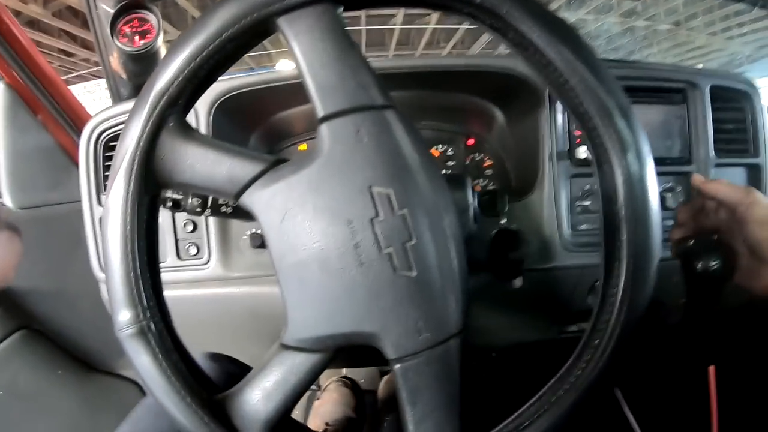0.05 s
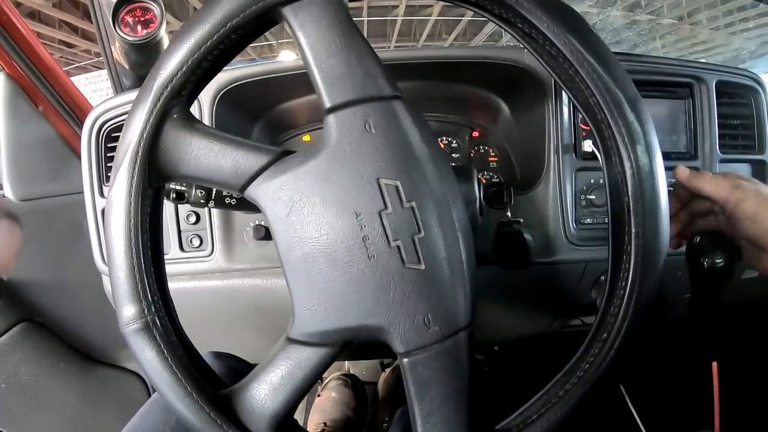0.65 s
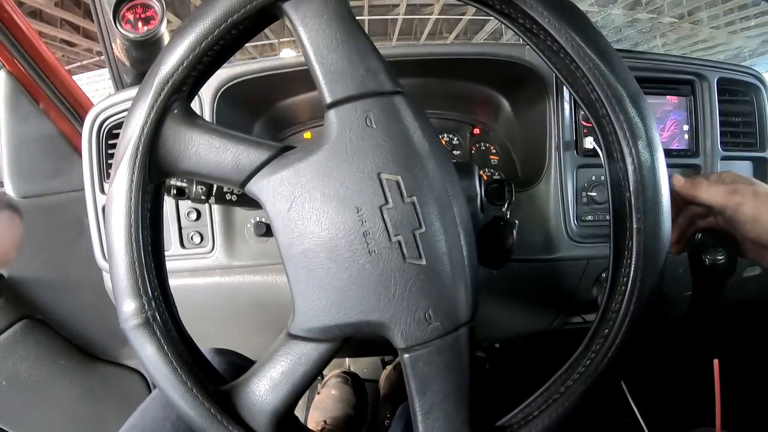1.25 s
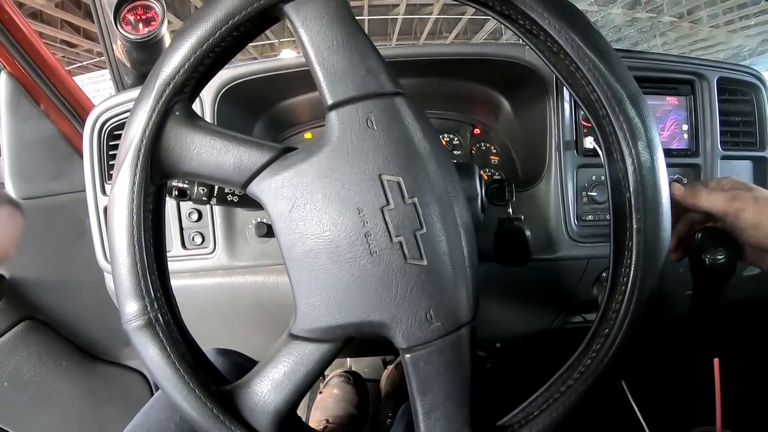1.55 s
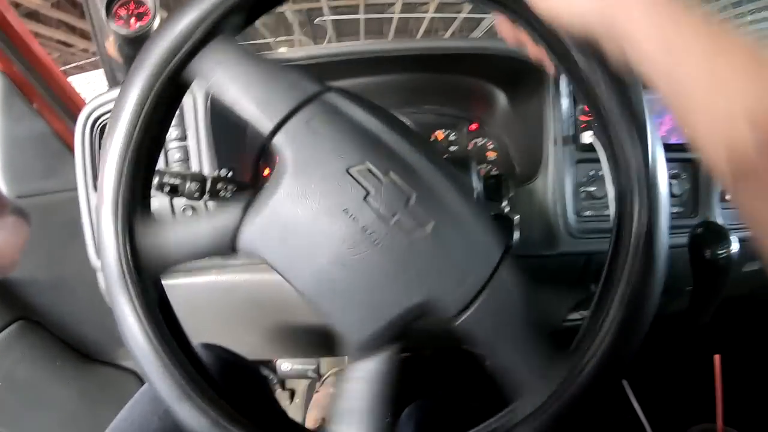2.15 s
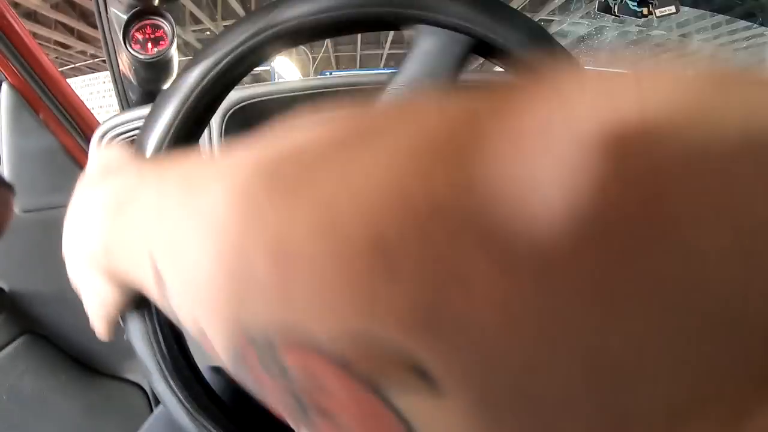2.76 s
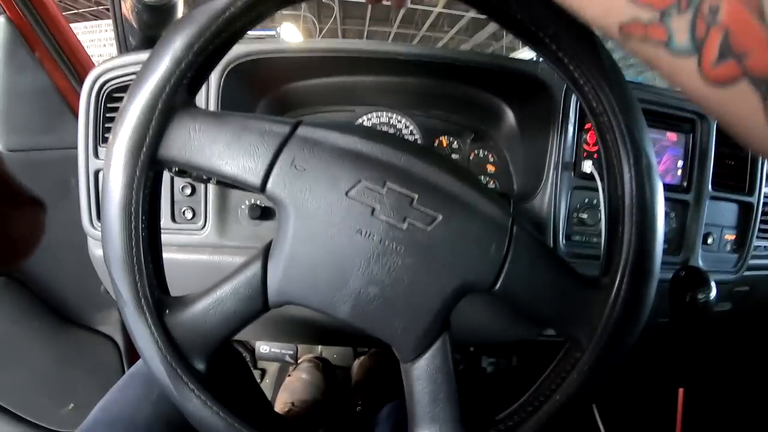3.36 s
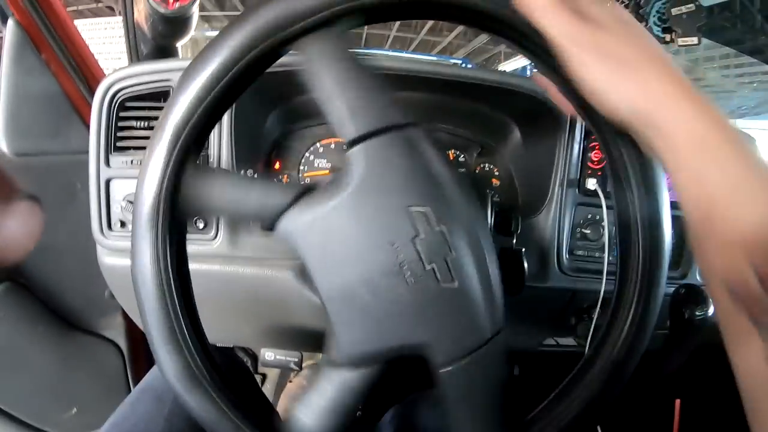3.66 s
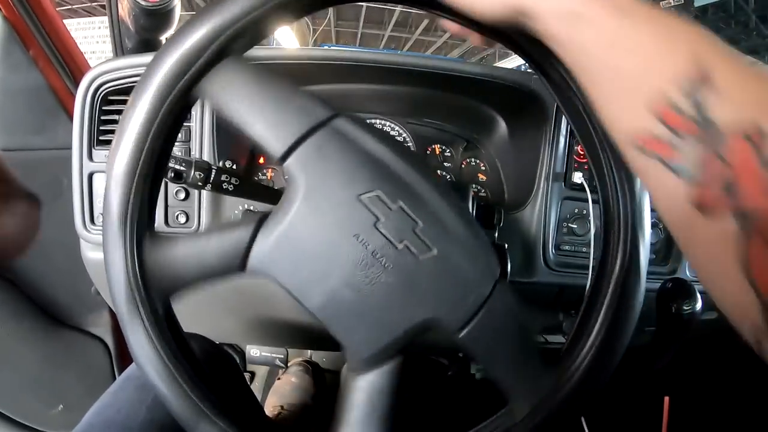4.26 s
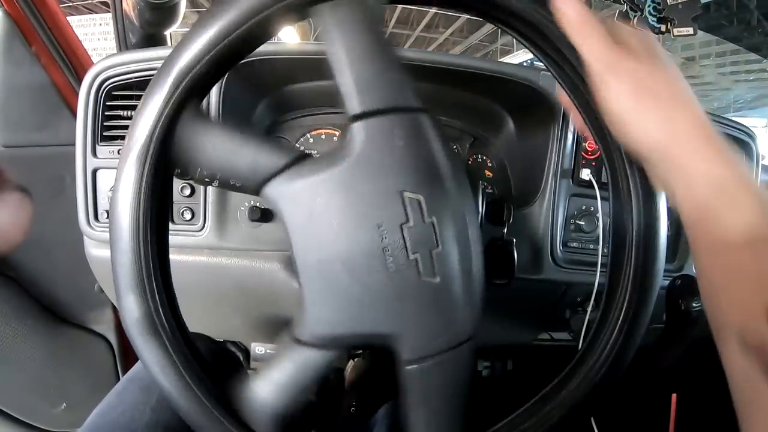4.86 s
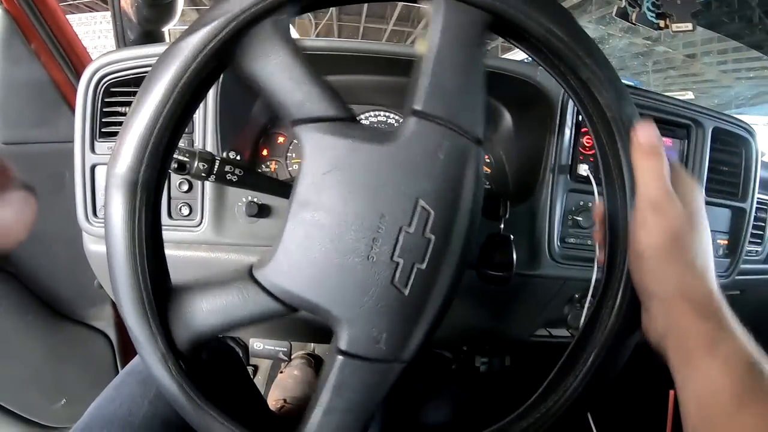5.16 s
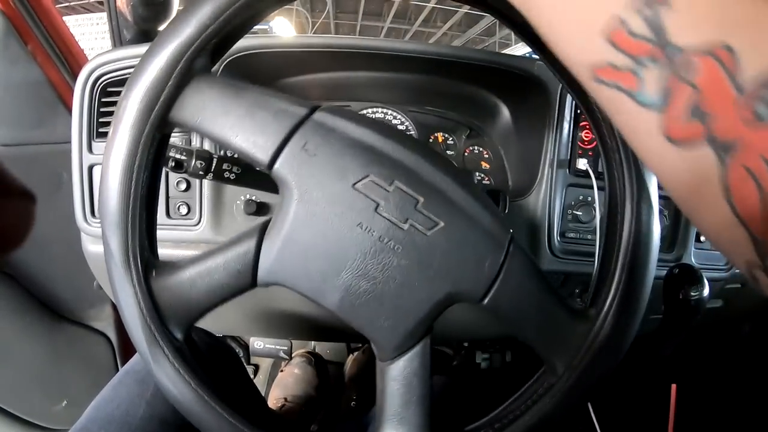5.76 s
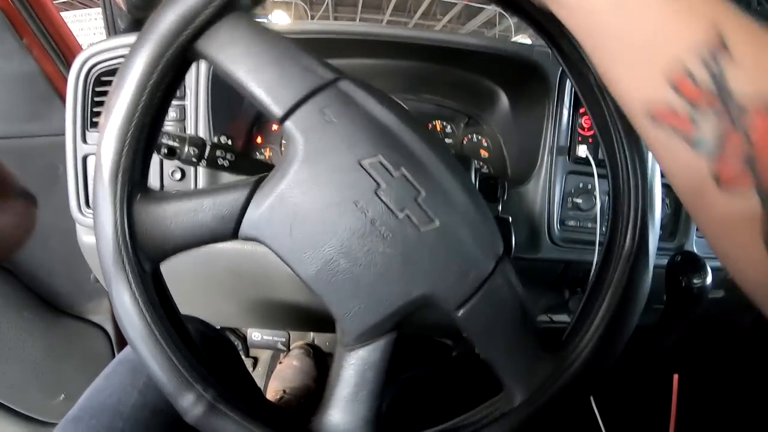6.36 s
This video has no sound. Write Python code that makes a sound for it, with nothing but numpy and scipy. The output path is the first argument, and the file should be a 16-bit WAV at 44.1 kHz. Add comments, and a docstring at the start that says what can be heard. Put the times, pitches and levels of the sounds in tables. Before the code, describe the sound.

Inside a truck cab, a just-started diesel engine chugs while the plastic dashboard squeaks faintly, then settles into a booming, rattling idle. A palm slides softly on the steering wheel, and the power steering rushes, dragging the engine down briefly before it recovers. The sound grows brighter and wider, a faint thin whine rises, and a second, softer steering rush follows.

```python
"""A diesel V8 heard in a truck's cab. Just started, it chugs while the dash squeaks faintly, then
settles to idle: firings boom and rattle the block, panels drone as the speed crosses their resonances.
From 2 s the driver winds the wheel: a palm slides on the rim, the steering valve rushes, the load drags
the engine down and it recovers. From 3 s the sound opens from dull mono to brighter stereo.
Near 4 s a thin whine climbs; a second, softer steering rush follows."""
import sys
import numpy as np
from scipy import signal
from scipy.fft import rfft, irfft, next_fast_len
from scipy.io import wavfile
from scipy.ndimage import uniform_filter1d, minimum_filter1d, map_coordinates

SR = 44100
rng = np.random.default_rng(int(sys.argv[2]) if len(sys.argv) > 2 else 0)


def output_pcm(signal):
    """Save a mono or channel-first signal as 16-bit PCM at the path in sys.argv[1].

    Samples are clipped to [-1, 1] before scaling.
    """
    pcm = np.clip(np.atleast_2d(signal).T, -1, 1) * 32767
    wavfile.write(sys.argv[1], SR, np.round(pcm).astype(np.int16))


N = 291501
TIME = np.arange(N) / SR

# low engine sounds, before trims: (time [s], rumble [dB], body [dB], drone and lope [dB])
LOW_LEVELS = [(0, -20, -27.5, -26), (.27, -21.5, -28, -20.5), (.5, -23.5, -28, -19.5),
              (.8, -23.5, -27.5, -29), (1.0, -21, -28, -17.5), (1.4, -21.5, -26.5, -26),
              (1.85, -21, -24.5, -16), (2.35, -20, -25, -17), (2.63, -23, -21.5, -16.5),
              (2.9, -22, -23.5, -19.5), (3.12, -24.5, -26, -16.5), (3.4, -28, -27.5, -23),
              (3.75, -24, -25, -23), (4.1, -23, -28, -22.5), (4.4, -26.5, -26, -22),
              (4.65, -21.5, -26.5, -30), (5.0, -27.5, -26.5, -22.5), (5.3, -22.5, -27.5, -26.5),
              (6.61, -26, -27.5, -24.5)]


def boom(firings):
    """The firing note and its octave boom in the cab."""
    note_levels = [(0.0, -12), (0.12, -9), (0.45, -11), (0.8, -13), (1.3, -14.5), (1.8, -12), (2.35, -14),
                   (2.6, -13), (2.8, -9), (3.13, -11), (3.32, -16), (3.44, -22), (3.52, -16), (3.7, -14),
                   (4.0, -15), (4.3, -17), (4.55, -12.5), (5.05, -14), (5.22, -16.5), (5.38, -14.5),
                   (5.57, -18.5), (5.78, -14), (6.15, -14), (6.61, -14)]  # (time [s], level [dB])
    octave_levels = [(0, -35), (.33, -28), (.48, -14), (.7, -18.5), (1.0, -21), (1.42, -25), (1.7, -21.5),
                     (2.65, -19), (3.3, -22), (3.62, -42), (3.95, -24), (4.4, -28), (4.75, -23.5),
                     (5.02, -28), (5.4, -23), (6.0, -29), (6.61, -26)]  # (time [s], level [dB])
    note = amp(curves(note_levels)[0]) * tone(firings, flutter_db=0.87, drift_rad=0.041, rate_hz=15)
    octave = tone(2 * firings, flutter_db=-0.5, drift_rad=0.16, rate_hz=15)
    return note + amp(curves(octave_levels)[0]) * octave


def panel_drone(firings, firing_hz):
    """Panels drone, each with its own lag, as firing harmonics cross their resonances."""
    # (harmonic, resonance [Hz], width [Hz], gain before recovery [dB], gain after [dB])
    panels = [(3, 129.8, 5.2, -2, 8), (3, 139.5, 5.2, -0.5, 2.5), (4, 175, 2.5, -3.5, 2),
              (5, 230.5, 7.4, -17, -9), (6, 269.5, 14, -11, -11.5)]
    drone = 0
    for harmonic, centre_hz, width_hz, early_db, late_db in panels:
        detuning = 2 * (harmonic * firing_hz - centre_hz) / width_hz
        partial = tone(harmonic * firings + rng.random(), flutter_db=0.8, drift_rad=0.16, rate_hz=5)
        drone += recovering(early_db, late_db) / (1 + detuning ** 2) * partial
    return amp(curves(LOW_LEVELS)[2] + 0.43) * drone


def lope(firings):
    """Unequal cylinders add tones between the firing harmonics, and one more on the fourth harmonic."""
    orders = [(3, -16, -14), (5, -11.5, -13), (6, -17, -34), (7, -13.5, -22), (9, -6.5, -2), (10, -16, -8),
              (11, -11.5, -9), (13, -4.5, -8.5), (14, -23, -16.5), (15, -14.5, -12), (16, -12, -7.5)]  # (crank order, gain before recovery [dB], gain after [dB])
    crank_turns = firings / 4
    tones = 0
    for order, early_db, late_db in orders:
        partial = tone(order * crank_turns + rng.random(), flutter_db=1.5, drift_rad=0.53, rate_hz=4)
        tones += recovering(early_db, late_db) * partial
    return amp(curves(LOW_LEVELS)[2] - 3) * tones


def chugging():
    """Until it burns evenly, the engine rocks on its mounts and the cab booms in surges."""
    chugs = [(.02, 62, -13.5), (.105, 94, -14), (.12, 137, -17.5), (.19, 66, -15.5), (.28, 94, -19),
             (.36, 64, -20), (.5, 140, -19), (.52, 68, -16.5), (.68, 68, -20)]  # (time [s], pitch [Hz], level [dB])
    return sum(amp(db) * swell(s, length_s=0.11)
               * tone(hz * TIME + rng.random(), flutter_db=0.5, drift_rad=0.2, rate_hz=12)
               for s, hz, db in chugs)


def shudder():
    """Uneven burning shakes the cab, then calms."""
    spectrum = [(8, -13), (28, 4), (55, 2), (72, 13.5), (100, 3), (125, -30), (200, -48), (400, -120)]  # (frequency [Hz], relative density [dB])
    start_db, idle_db = -26, -29.5
    return amp(start_db + (idle_db - start_db) * ramp(0.55, 0.41)) * in_cab(spectrum, white())


def combustion(firings):
    """Each firing thumps the mounts and shakes the block; the firewall dulls it."""
    # spectra: (frequency [Hz], relative density [dB])
    rumble_spectrum = [(30, -74), (100, -3), (135, 3), (175, 1.5), (200, -5.5), (280, -7), (340, -19),
                       (600, -51), (1200, -120)]
    body_spectrum = [(160, -20.5), (280, -2), (334, -5.5), (398, -4), (498, -6), (571, -10.5), (700, -13.5),
                     (910, -39.5), (1600, -120)]
    knock_mono = [(410, -18.5), (700, 0), (800, -1), (1090, -3), (1300, -3), (1380, -7), (1500, -6.5),
                  (1660, -7), (1870, -8.5), (2000, -10), (2600, -42), (4400, -120)]
    knock_stereo = [(410, -16), (700, -0.5), (824, 0), (880, -2.5), (1020, 0.5), (1140, 0.5), (1260, -0.5),
                    (1540, -1), (1690, -1), (1860, -3), (2000, -10.5), (2600, -30), (4400, -120)]
    thumps = bursts(firings, decay_periods=0.17, depth=0.47, cylinder_db=1.3, scatter_db=0.8, repeat=0.058)
    shakes = bursts(firings, decay_periods=0.44, depth=0.22, cylinder_db=4, scatter_db=2.5, repeat=0.21)
    knocks = bursts(firings, decay_periods=0.34, depth=0.08, cylinder_db=2, scatter_db=1.5, repeat=0.2)
    rumble_db, body_db, _ = curves(LOW_LEVELS)
    rumble = amp(rumble_db - 2) * in_cab(rumble_spectrum, thumps)
    body = amp(body_db) * in_cab(body_spectrum, shakes)
    knock_gain = effort_gain(idle_db=-29.5, growth=1) * amp(0.5 * swell(1.7, length_s=0.82))
    return rumble + body + knock_gain * opening(knock_mono, knock_stereo, knocks)


def injectors(firings):
    """Injectors and valves tick, smeared by the engine bay; struck covers and pipes ring."""
    spectrum = [(1300, -49), (1950, -0.5), (2300, 1.5), (2800, -1.5), (3200, -5), (3600, -11), (4100, -12),
                (4450, -12), (4900, -21.5), (8000, -120)]  # (frequency [Hz], relative density [dB])
    metal_modes = [(750, 8, -7), (815, 8, -7), (926.4, 9, -3), (986.5, 7, -2), (1235, 20, -4),
                   (1515, 20, -8), (1782, 9, -8), (1829.5, 6.5, -1.5), (1876, 14, -7), (1927, 13, -3.5),
                   (1972, 13, -8), (2290, 16, -10), (3025, 30, -14), (3770, 23, -20)]  # (frequency [Hz], width [Hz], relative level [dB])

    def metal(f):
        return sum(amp(db) / np.sqrt(width) / (1 + 1j * (f - hz) / width) ** 2
                   for hz, width, db in metal_modes)

    ticks = bursts(firings, decay_periods=0.28, depth=0.11, cylinder_db=2, scatter_db=2.5, repeat=0.12)
    taps = bursts(firings, decay_periods=0.12, depth=0.85, cylinder_db=2, scatter_db=2, repeat=0.2)[0]
    ring = amp(-0.8) * unit(filtered(taps, metal))
    return effort_gain(idle_db=-40.5, growth=0.9, stereo_db=4.9) * (in_cab(spectrum, ticks) + ring)


def engine_hiss(firings):
    """Flickering hiss, pulsed faintly by the firings."""
    # spectra: (frequency [Hz], relative density [dB])
    mono = [(500, -68), (3500, -9), (4900, -6), (5700, -4), (6500, -7.5), (7800, -8.5), (8400, -16.5),
            (9200, -18.5), (10300, -17), (11500, -21.5), (13500, -31), (15000, -50)]
    stereo = [(500, -60), (3500, -22), (4900, -1.5), (5700, -0.5), (6500, -4.5), (7800, -6), (8400, -10),
              (9200, -14), (10300, -11), (11500, -15), (13500, -24), (15000, -51)]
    puffs = bursts(firings, decay_periods=0.25, depth=0.04, cylinder_db=2, scatter_db=3, repeat=0.1)
    gain = effort_gain(idle_db=-49, growth=1.35, stereo_db=-2.34) * amp(0.3 * wobble(rate_hz=16))
    return gain * opening(mono, stereo, puffs)


def steering():
    """Fluid rushes through the valve, brighter under strain; the swung wheel thuds softly."""
    strain = [(2.1, 550, -70), (2.4, 600, -37), (2.56, 700, -26), (2.68, 1150, -20.5), (2.78, 1420, -21),
              (2.95, 1240, -22.5), (3.12, 1110, -26), (3.3, 750, -38), (3.6, 600, -70), (4.4, 610, -45),
              (4.68, 766, -26), (4.9, 700, -43), (5.2, 600, -70)]  # (time [s], centre [Hz], level [dB])
    valve_spectrum = [(250, -28), (450, 6.5), (1200, -4.5), (1950, -1.5), (2300, -5), (5000, -60)]  # (frequency [Hz], relative density [dB])
    wheel_thuds = [(2.35, 31, -19), (4.93, 29.6, -31)]  # (time [s], pitch [Hz], level [dB])
    centre_hz, rush_db = curves(strain)
    rush = amp(rush_db) * swept(in_cab(valve_spectrum, white()), centre_hz, width_octaves=0.63)
    thuds = sum(amp(db) * swell(s, 0.08) * tone(hz * TIME, flutter_db=-3, drift_rad=0.4, rate_hz=12)
                for s, hz, db in wheel_thuds)
    return rush + thuds


def whine():
    """A thin tone, as of a turbo spooling, climbs and levels off."""
    levels = [(3.7, -90), (3.86, -61), (3.93, -53), (4.02, -57), (4.3, -58), (4.55, -55.5), (4.72, -55.5),
              (4.84, -59.5), (5.78, -59), (5.94, -51.5), (6.21, -52.5), (6.36, -57.5), (6.61, -58.5)]  # (time [s], level [dB])
    top_hz, climb_hz = 4610, 308
    pitch_hz = top_hz - climb_hz * (1 - ramp(3.87, 2.65)) ** 3
    cycles = np.cumsum(pitch_hz) / SR
    return amp(curves(levels)[0]) * tone(cycles, flutter_db=1.7, drift_rad=0.38, rate_hz=24)


def palm():
    """A palm rubs dash and rim in tiny slips."""
    strokes = [(2.135, .05, -53), (2.67, .07, -55), (2.776, 0.11, -44.5), (5.3, .08, -58), (5.83, .06, -62)]  # (time [s], length [s], level [dB])
    skin_spectrum = [(1000, -26), (3000, 0), (5500, 5), (8000, 1), (11000, -5), (13500, -13), (15500, -19)]  # (frequency [Hz], relative density [dB])
    slips = amp(1.5 * wobble(rate_hz=500)) * white()
    envelope = sum(amp(db) * swell(s, length_s) for s, length_s, db in strokes)
    return envelope * in_cab(skin_spectrum, slips)


def dash_squeaks():
    """Dash plastic squeaks briefly."""
    squeaks = [(.471, .05, 7350, 150, -56), (.444, .013, 11250, 350, -61), (.471, .022, 11200, 300, -63.5),
               (.445, .014, 12850, 400, -69), (.472, .02, 12800, 350, -70.5), (.852, .05, 4680, 35, -53.5),
               (.866, .022, 7350, 120, -58)]  # (time [s], length [s], pitch [Hz], width [Hz], level [dB])
    return sum(amp(db) * swell(s, length_s)
               * tone(hz * TIME, flutter_db=3, drift_rad=0.9, rate_hz=width_hz)
               for s, length_s, hz, width_hz, db in squeaks)


def bursts(firings, decay_periods, depth, cylinder_db, scatter_db, repeat):
    """A dying noise burst per firing; each cylinder has its own strength and partly repeating rattle."""
    cylinders, rattle_samples = 8, 2048
    index = firings.astype(int)
    bias = unit(rng.uniform(-0.74, 1, cylinders))
    scatter = unit(rng.uniform(-1, 1, cylinders ** 3))
    strength = amp(cylinder_db * bias[index % cylinders] + scatter_db * scatter[index % len(scatter)])
    envelope = unit(strength * np.exp(-(firings % 1) / decay_periods))
    age_samples = np.arange(N) - np.searchsorted(index, index)
    rattles = rng.standard_normal((2, cylinders, rattle_samples))
    repeating = rattles[:, index % cylinders, age_samples % rattle_samples]
    noise = np.sqrt(repeat) * repeating + np.sqrt(1 - repeat) * white()
    return np.sqrt(1 - depth + depth * envelope ** 2) * noise


def tone(cycles, flutter_db, drift_rad, rate_hz):
    """A sine of rms 1 with wavering level and phase."""
    flutter = amp(flutter_db * wobble(rate_hz))
    return unit(flutter * np.cos(2 * np.pi * cycles + drift_rad * wobble(rate_hz)))


def effort_gain(idle_db, growth, stereo_db=0):
    """Gain that follows how hard the engine burns, shifted by stereo_db as the image opens."""
    effort = [(0, 0.5), (.3, -3), (.55, -2), (.85, -2), (1.4, 1), (2.4, 0.5), (2.65, 1.2), (3.05, 0.6),
              (3.35, -1.9), (3.58, -2), (4.12, -0.5), (4.5, -0.8), (5.0, 0.1), (5.3, 0.46), (6.61, 1.36)]  # (time [s], effort re idle [dB])
    return amp(idle_db + growth * curves(effort)[0] + stereo_db * stereo_share())


def recovering(early_db, late_db):
    """Gain that shifts as the engine recovers from the steering load."""
    return amp(early_db + (late_db - early_db) * ramp(3.2, 0.35))


def in_cab(spectrum, drive):
    """Colour two noises, mid rms 1: alike at both ears in the bass, diffuse in the treble."""
    likeness = [(200, 1), (350, 0.99), (520, 0.94), (700, 0.43), (1030, 0.15), (2600, 0.2), (3400, 0.58),
                (5000, -0.22), (7000, -0.4), (10000, -0.087)]  # (frequency [Hz], left-right correlation)

    def colour(hz):
        angle = np.arccos(np.clip(along(likeness, hz), -1, 1)) / 2
        return amp(along(spectrum, hz)) * np.array([np.cos(angle), np.sin(angle)])

    mid, side = filtered(drive, colour)
    return np.array([mid + side, mid - side]) / np.std(mid)


def stereo_share():
    """Fade from mono (0) to stereo (1)."""
    return ramp(start_s=3.05, length_s=1.6)


def opening(mono_spectrum, stereo_spectrum, drive):
    """Cab noise that changes colour as the image opens."""
    share = stereo_share()
    return (1 - share) * in_cab(mono_spectrum, drive) + share * in_cab(stereo_spectrum, drive)


def swept(x, centre_hz, width_octaves):
    """x through a broad moving resonance, rms 1."""
    hz, frame_s, frames = signal.stft(x, SR, nperseg=1024)
    octaves_off = np.log2((hz[:, None] + 1) / np.interp(frame_s, TIME, centre_hz))
    gain = np.exp(-(octaves_off / width_octaves) ** 2)
    frames = frames * gain / np.linalg.norm(gain, axis=0)
    return unit(signal.istft(frames, nperseg=1024)[1][:, :N])


def filtered(x, response):
    """x through a frequency response."""
    size = next_fast_len(N + SR // 4, real=True)
    return irfft(rfft(x, size) * response(np.fft.rfftfreq(size, 1 / SR)), size)[..., :N]


def wobble(rate_hz):
    """A smooth random curve."""
    knots = rng.standard_normal(int(N * rate_hz / SR) + 4)
    coarse_s = TIME[::32]
    return np.interp(TIME, coarse_s, map_coordinates(knots, [coarse_s * rate_hz]))


def white():
    """Two unrelated noises."""
    return rng.standard_normal((2, N))


def along(points, hz):
    """(Hz, value) points read on a log axis."""
    knots_hz, values = np.transpose(points)
    return np.interp(np.log(hz + 1), np.log(knots_hz + 1), values)


def curves(rows):
    """A per-sample curve for each column after the time."""
    times_s, *columns = np.transpose(rows)
    return [np.interp(TIME, times_s, column) for column in columns]


def ramp(start_s, length_s):
    """A rise from 0 to 1."""
    return np.clip((TIME - start_s) / length_s, 0, 1)


def swell(centre_s, length_s):
    """A bell-shaped rise and fall."""
    return np.exp(-(2 * (TIME - centre_s) / length_s) ** 2)


def amp(db):
    """Decibels to gain."""
    return 10 ** (np.asarray(db) / 20)


def unit(x):
    """Scale to rms 1."""
    return x / np.sqrt(np.mean(x ** 2) + 1e-20)


def scene():
    """One crankshaft times the firings; the cab brings some bands louder or earlier to one side."""
    engine_speed = [(0.0, 38.56), (0.2, 42.91), (0.38, 42.11), (0.62, 46.24), (0.95, 44.6), (1.3, 45.6),
                    (1.85, 44.65), (2.42, 45.08), (2.7, 43.47), (3.0, 42.7), (3.14, 43.2), (3.3, 45.2),
                    (3.42, 47.8), (3.82, 46.33), (4.05, 44.84), (4.33, 46.4), (4.9, 45.96), (5.33, 44.8),
                    (5.56, 45.87), (6.61, 45.71)]  # settles, sags under load, overshoots: (time [s], firing rate [Hz])
    balance = [(60, -0.5), (500, -0.5), (700, -2), (1030, 5), (1900, 1.5), (2600, 2), (3400, 2),
               (5000, 0.5), (10000, 0)]  # (frequency [Hz], left minus right [dB])
    left_lead = [(200, 0.068), (520, 0.04), (780, 0.59), (980, 0.31), (3200, 0), (4400, 0.4), (5000, 0.027)]  # (frequency [Hz], phase lead [rad])
    firing_hz, = curves(engine_speed)
    firings = np.cumsum(firing_hz) / SR
    cab = boom(firings) + panel_drone(firings, firing_hz) + lope(firings) + chugging()
    cab = cab + shudder() + combustion(firings) + injectors(firings) + engine_hiss(firings)
    cab = cab + whine() + steering() + palm() + dash_squeaks()
    sides = np.array([[0.5], [-0.5]])
    return filtered(cab, lambda hz: amp(sides * along(balance, hz))
                    * np.exp(1j * sides * along(left_lead, hz)))


def record(dry):
    """The image opens from mono to stereo; peaks are limited and the top treble is cut."""
    ceiling, limiter_samples, top_hz = 0.96, 400, 14600
    mid = dry.mean(axis=0)
    image = mid + stereo_share() * (dry - mid)
    needed_gain = ceiling / np.maximum(np.abs(image).max(axis=0), ceiling)
    gain = uniform_filter1d(minimum_filter1d(needed_gain, limiter_samples), limiter_samples)
    fades = ramp(0, 0.003) * ramp(TIME[-1], -0.003)
    return filtered(fades * gain * image, lambda hz: hz < top_hz)


dry = scene()
out = record(dry)
output_pcm(out)
```